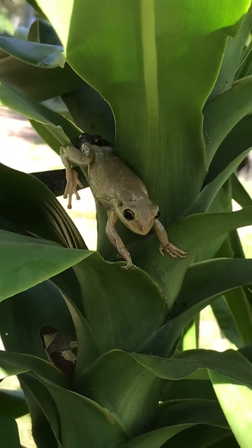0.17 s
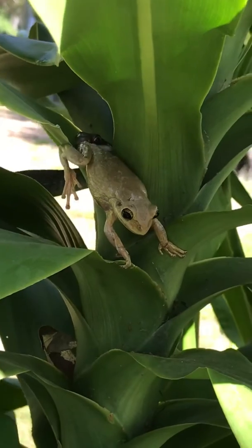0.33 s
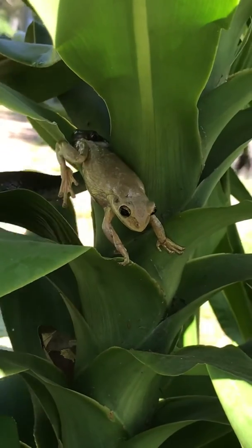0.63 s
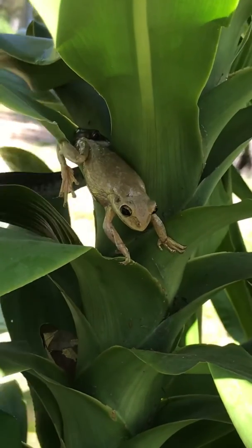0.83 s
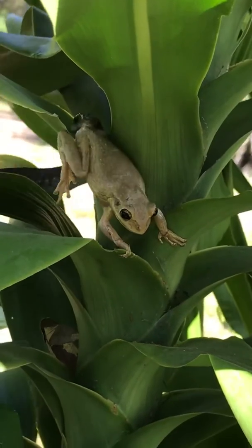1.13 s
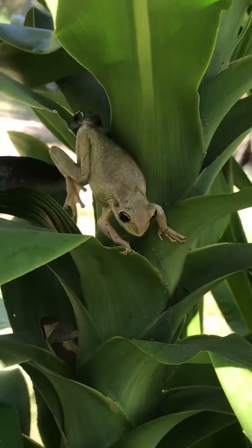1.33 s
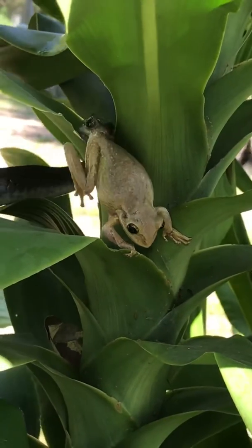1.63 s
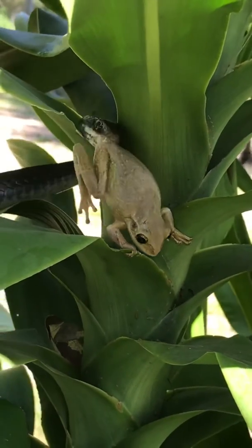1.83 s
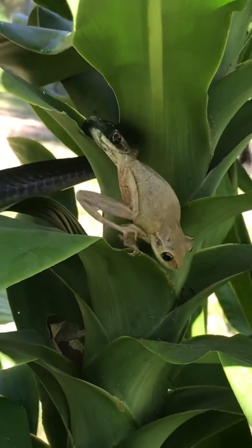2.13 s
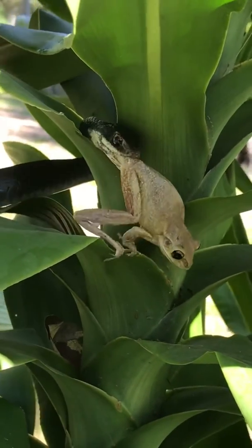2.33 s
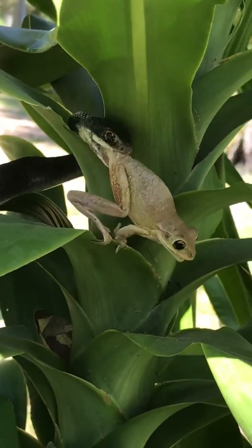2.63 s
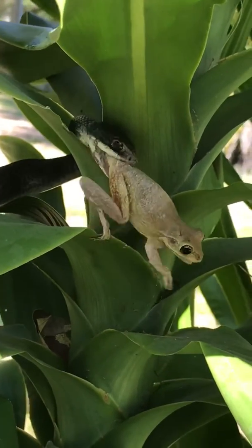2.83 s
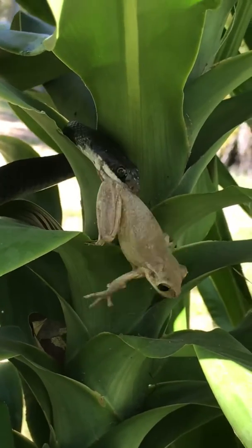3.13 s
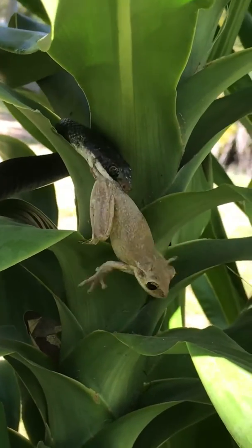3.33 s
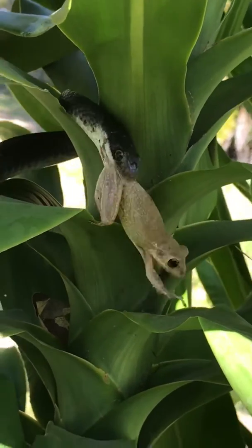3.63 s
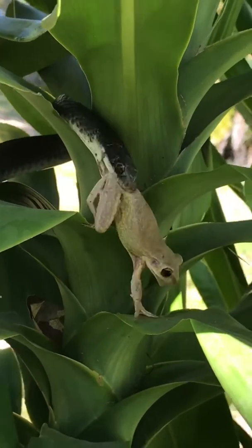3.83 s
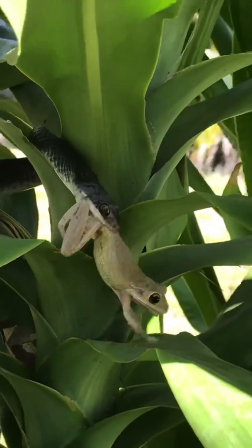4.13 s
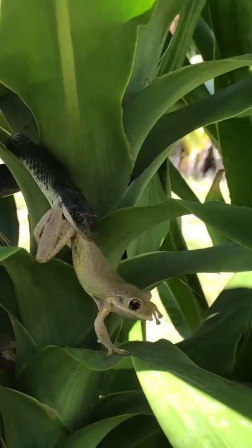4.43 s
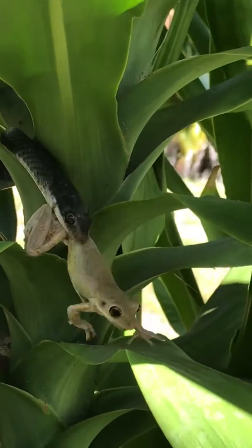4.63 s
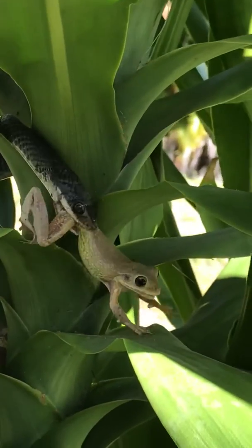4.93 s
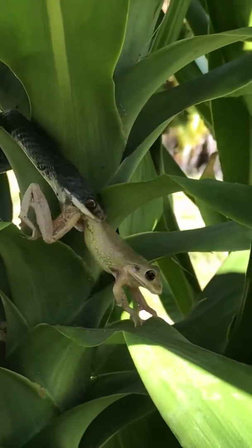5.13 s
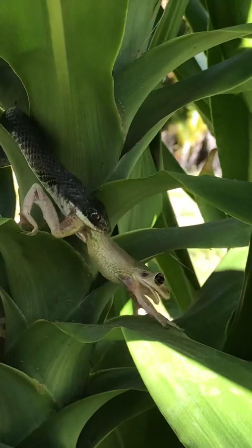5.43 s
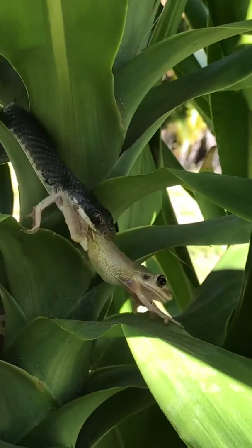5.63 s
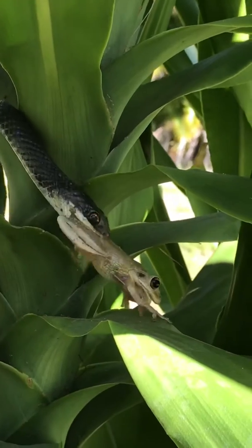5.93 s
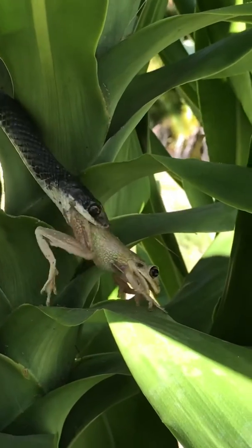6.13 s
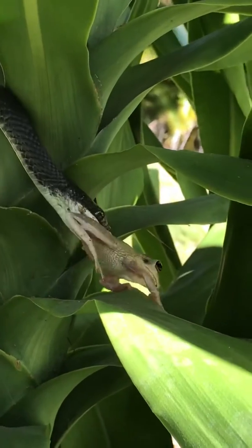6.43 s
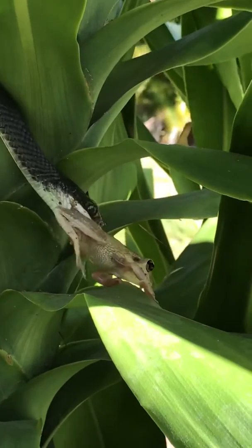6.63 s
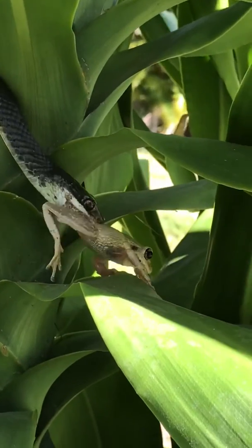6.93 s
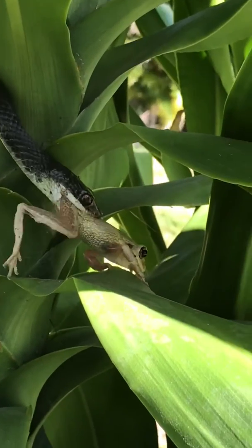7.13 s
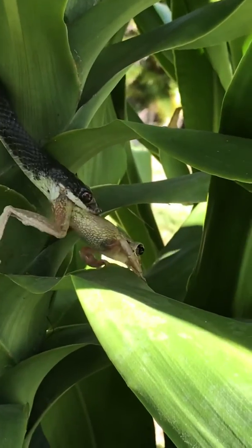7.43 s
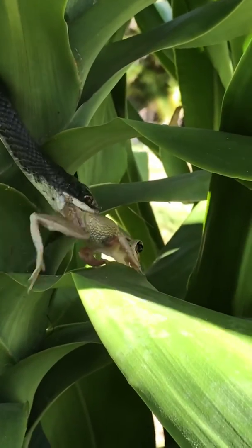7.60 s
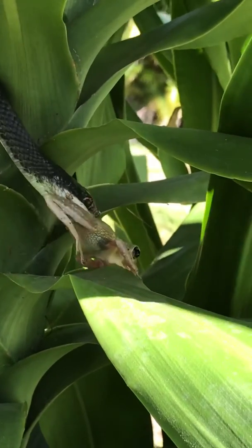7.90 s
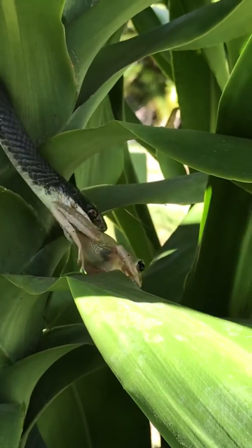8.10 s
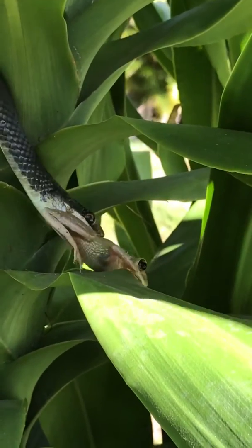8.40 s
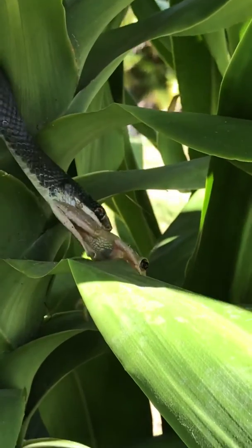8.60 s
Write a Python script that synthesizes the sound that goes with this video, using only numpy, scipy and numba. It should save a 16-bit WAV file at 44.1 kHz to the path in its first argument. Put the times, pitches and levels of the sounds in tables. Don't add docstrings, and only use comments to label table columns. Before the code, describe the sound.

Outdoors among broad leaves, close to a phone microphone: soft bright rustling, one sharp leaf tick, faint rising bird whistles and a distant dove coo over low traffic hum. Then a frog screams seven times, piercing, arching and falling in pitch, each shutting into a dull creak, some followed by tiny squeaky gasps. Wind buffets grow under the later screams; afterwards leaves and dove remain.

```python
import sys
import numpy as np
from scipy import signal
from scipy.io import wavfile
from scipy.ndimage import uniform_filter1d
from numba import njit

SR = 44100
rng = np.random.default_rng(int(sys.argv[2]) if len(sys.argv) > 2 else 0)


def elevation(decibels):
    levels = np.asarray(decibels, float)
    return 10 ** (levels / 20)


def generate_wav(signal):
    frames = np.transpose(np.atleast_2d(signal))
    scaled = np.clip(frames, -1, 1) * 32767
    pcm = np.round(scaled).astype(np.int16)
    wavfile.write(sys.argv[1], SR, pcm)


N = 386316
STEP = 96

# time_s, pitch_hz
SCREAM_PITCHES = [
    [(2.42, 575.4), (2.436, 646), (2.48, 685), (2.586, 613), (2.62, 632), (2.646, 662.5), (2.754, 685.7),
     (2.836, 617), (2.9, 586.5)],
    [(3.014, 503), (3.05, 592), (3.092, 764), (3.124, 776), (3.164, 770), (3.196, 711), (3.3, 660),
     (3.34, 590)],
    [(3.737, 450), (3.786, 715), (3.808, 766), (3.854, 770.6), (4.028, 667), (4.164, 615.6), (4.278, 613.6),
     (4.315, 538)],
    [(4.628, 532), (4.66, 618), (4.686, 725), (4.724, 740), (4.8, 631.6), (4.848, 622.5), (4.928, 541),
     (4.955, 496)],
    [(5.342, 293), (5.412, 509), (5.434, 513), (5.47, 473), (5.5, 472), (5.53, 472.2), (5.622, 468.5),
     (5.648, 430.3)],
    [(5.928, 293.5), (5.95, 416), (5.998, 668), (6.018, 687), (6.06, 577), (6.114, 517.6), (6.22, 471.5),
     (6.247, 417)],
    [(7.503, 322), (7.544, 686), (7.568, 768), (7.602, 783), (7.65, 718), (7.674, 711.4), (7.778, 632.6),
     (7.886, 580), (7.92, 515)],
]
# time_s, mouth_resonance_hz, level_db
JAWS = [
    [(2.442, 4600, -25.5), (2.476, 6650, -24.5), (2.65, 5130, -23.5), (2.762, 5210, -22),
     (2.864, 4450, -21.5), (2.885, 3920, -29)],
    [(3.05, 3880, -31), (3.082, 4420, -19.5), (3.134, 4220, -27), (3.185, 4300, -19), (3.292, 3790, -26),
     (3.325, 3195, -27.5)],
    [(3.749, 5300, -32), (3.763, 5930, -21), (3.817, 6040, -19.5), (4.0, 5350, -20.5), (4.125, 4610, -20),
     (4.268, 4380, -17.5), (4.295, 3840, -23)],
    [(4.644, 5280, -25.5), (4.682, 6580, -20.5), (4.78, 5930, -17.5), (4.864, 5610, -23),
     (4.942, 4220, -25.5)],
    [(5.358, 5960, -31), (5.416, 6110, -19.5), (5.48, 5920, -23), (5.602, 5200, -24.5), (5.635, 4255, -30)],
    [(5.94, 6160, -24.5), (6.014, 6690, -21), (6.08, 6360, -20), (6.204, 5740, -25.5), (6.235, 4540, -32.5)],
    [(7.521, 6550, -23), (7.583, 7370, -15), (7.7, 5910, -20), (7.746, 5740, -23.5), (7.886, 5120, -23),
     (7.913, 4340, -28)],
]
# throat_db, lower_skull_db, upper_skull_db, upper_skull_sag_db_per_s, throat_onset_db
SCREAM_COLOURS = [(-39, -41.5, -42.5, -12, -12), (-39.5, -36, -31, -1.5, -13), (-40, -36, -27.5, 12.5, -16),
                  (-41, -36, -32.5, 38, -13), (-40, -43, -44, 48, -27), (-43, -33, -36.5, 47.5, -5),
                  (-41, -31.5, -37, 21, -10)]
# end_s, last_pitch_hz, throat_db, lip_leak_db, leak_fading_db
CREAK_ENDS = [
    (2.996, 468, -42.5, -52, 1),
    (3.45, 189.7, -42.5, -44, -10.5),
    (4.386, 224, -39.5, -41.5, -27),
    (5.024, 213.9, -41.5, -48.5, -26),
    (5.734, 187.6, -40.5, -54, -29),
    (6.318, 209, -40, -56, -12),
    (8.012, 225.5, -39, -50.5, -29),
]
JAW_STARTS = [.7, .7, .6, .8, .9, .85, .5]
ONSET_CATCHES = [.05, .04, .12, .12, .15, .1, .12]
# start_s, roughness (0-1)
CORD_STUMBLES = [(3.14, .05), (4.0, .06), (4.66, .12), (5.44, .1), (5.5, .06), (6.03, .08), (7.71, .04),
                 (7.87, .08)]
RASP, RASP_AT = .03, .4


def screams():
    t, rough = np.arange(N) / SR, .006
    pitches, tracts = zip(*map(cry, SCREAM_PITCHES, JAWS, SCREAM_COLOURS, CREAK_ENDS, JAW_STARTS))
    onsets = [(pitch[0][0], catch) for pitch, catch in zip(SCREAM_PITCHES, ONSET_CATCHES)]
    rasps = []
    for pitch, creak in zip(SCREAM_PITCHES[1:], CREAK_ENDS[1:]):
        shut_s = pitch[-1][0]
        rasps.append((shut_s + RASP_AT * (creak[0] - shut_s), RASP))
    for start, catch in onsets + list(CORD_STUMBLES) + rasps:
        rough = rough + catch * (t > start) * np.exp(-((t - start) / .04) ** 2)
    clean = voice(sum(pitches, []), sounding(tracts), open_tract, .003 + .03 * rough, count=54)
    return clean * (1 + rough * drift(300))


THROAT_DB_PER_SLACK, SKULL_DB_PER_SLACK = 12, -60
ONSET_DB, TOP_LATE_DB, TOP_RISE_S = -32.5, -17.5, 0.065
SHUT_S = 0.014
CREAK_STEP, CREAK_BEND = .08, 0.51
CREAK_HOLD, CREAK_FADE_DB = .9, -16
SKULL_LEAK_DB, SKULL_DAMP_DB = -5, -19


def cry(pitch, jaw, colour, creak, open_from):
    (s, hz), (jaw_s, mouth_hz, mouth_db) = np.transpose(pitch), np.transpose(jaw)
    throat_db, between_db, top_db, sag_db, entry_db = colour
    end, last_hz, creak_db, leak_db, fade_db = creak
    fall = 1 - last_hz / hz[-1]

    t = np.append(np.arange(s[0], jaw_s[-1], .004), jaw_s[-1])
    slack = (1 - np.interp(t, s, hz) / hz.max()) * (t > s[hz.argmax()])
    early = np.clip((jaw_s[0] - t) / (jaw_s[0] - s[0]), 0, 1)
    swell = ONSET_DB * early
    late = TOP_LATE_DB * np.exp(-(t - s[0]) / TOP_RISE_S)
    opened = [t,
              np.interp(t, jaw_s, mouth_hz) * open_from ** early,
              throat_db + THROAT_DB_PER_SLACK * slack + entry_db * early,
              np.interp(t, jaw_s, mouth_db) + swell,
              between_db + SKULL_DB_PER_SLACK * slack + late / 2 + .6 * swell,
              top_db - sag_db * (t - s[0]) + late + 0.53 * swell]

    part = np.linspace(0, 1, 12)
    from_hz = (1 - CREAK_STEP * fall) * hz[-1]
    creak_hz = from_hz + (last_hz - from_hz) * part ** (from_hz / last_hz) ** CREAK_BEND
    falling = zip(s[-1] + 0.0027 + part * (end - s[-1]), creak_hz)
    shut = jaw_s[-1] + SHUT_S
    fading = CREAK_FADE_DB * fall / 0.42 * np.clip((part - CREAK_HOLD) / (1 - CREAK_HOLD), 0, 1)
    leak = leak_db + fade_db * part
    skull = leak + SKULL_LEAK_DB + SKULL_DAMP_DB * fall * part
    closed = [shut + part * (end - shut), 0 * part + mouth_hz[-1], creak_db + fading, leak, skull, skull]
    return list(pitch) + list(falling), list(zip(*opened)) + list(zip(*closed))


THROAT_OPEN_HZ, THROAT_SHUT_HZ, THROAT_WIDTH_HZ = 2130, 1536, 1190
# centre_hz, width_hz, level_db relative to the throat
PHARYNX_MODE = (3300, 1300, -10)
# centre_hz, width_hz
SKULL_MODES = [(9300, 3200), (14600, 3400)]
# centre_hz, width_hz, level_db
NOSTRIL_MODES = [(7300, 300, 15), (11700, 300, 8)]


def open_tract(hz, mouth_hz, throat_db, mouth_db, between_db, top_db):
    gape = 1 / (1 + elevation(2 * (throat_db - mouth_db)))
    throat_hz = THROAT_SHUT_HZ + gape * (THROAT_OPEN_HZ - THROAT_SHUT_HZ)
    throat = resonance(hz, throat_hz, THROAT_WIDTH_HZ) ** 2
    throat = evened(throat * resonance(hz, throat_hz, 1500 + 900 * (1 - gape)))
    throat = throat - gape * elevation(PHARYNX_MODE[2]) * evened(resonance(hz, *PHARYNX_MODE[:2]) ** 2)
    throat = throat * (1 - 0.72 * gape * resonance(hz, 2700, 900))

    mouth_hz = 3400 + gape * (mouth_hz - 3400)
    mouth = resonance(hz, mouth_hz, 450 * (mouth_hz / 4500) ** 1.6)
    mouth = mouth + 0.41 * resonance(hz, 0.78 * mouth_hz, 1200)
    mouth = mouth + 0.31 * resonance(hz, 1.223 * mouth_hz, 900)
    mouth = mouth * resonance(hz, mouth_hz, 2400) ** 2
    mouth = mouth * (1 - 0.93 * resonance(hz, 8020, 1100))

    scatter = np.exp(2j * np.sin(hz / 450))
    between, top = [resonance(hz, *mode) ** 2 * scatter for mode in SKULL_MODES]
    nostrils = sum(elevation(db) * resonance(hz, *mode) ** 2 for *mode, db in NOSTRIL_MODES)
    between = between + (1 - gape) * nostrils
    top = top * resonance(hz, 15000 * (mouth_hz / 5500) ** .2, 2500)
    return (elevation(throat_db) * throat + elevation(mouth_db) * evened(mouth)
            - elevation(between_db) * evened(between) + elevation(top_db) * evened(top))


# delay_ms, share
LEAF_ECHOES = [(0.618, 0.1), (1.129, 0.085), (2.3, 0.31), (4.898, 0.28)]


def voice(pitch_rows, tract_rows, tract, jitter, count):
    rate = in_time(pitch_rows, round_s=.016)[0] * (1 + .003 * drift(18) + .0025 * drift(40))
    grid = np.minimum(np.arange(N // STEP + 2) * STEP, N - 1)
    controls = in_time(tract_rows, STEP, round_s=.003)
    live = controls[-1] > -119
    hz = rate[grid[live], None] * np.arange(1, count + 1)
    sway = .035 * drift(2)[grid[live], None]
    echoes = 1
    for ms, share in LEAF_ECHOES:
        echoes = echoes + share * np.exp(-2j * np.pi * hz * ms / 1000 * (1 + sway))
    response = np.zeros((len(grid), count), complex)
    response[live] = tract(hz, *[c[live, None] for c in controls]) * echoes * (hz < .45 * SR)
    phase = 2 * np.pi * np.cumsum(rate * (1 + jitter * drift(150))) / SR
    return stack(phase, response, STEP)


@njit
def stack(phase, response, step):
    out = np.zeros(len(phase))
    for i in range(len(phase)):
        j, part = i // step, (i % step) / step
        if abs(response[j, 3]) + abs(response[j, 4]) < 1e-5:
            continue
        turn = np.exp(1j * phase[i])
        z = turn
        for k in range(response.shape[1]):
            strength = (1 - part) * response[j, k] + part * response[j + 1, k]
            out[i] += (z * strength).real
            z *= turn
    return out


def resonance(hz, centre_hz, width_hz):
    return 1 / (1 + 1j * (hz ** 2 - centre_hz ** 2) / (hz * width_hz))


def evened(response):
    return response / np.sqrt(np.sum(np.abs(response) ** 2, axis=1, keepdims=True) / 2)


# start_s, length_s, top_pitch_hz, level_db
GASP_EVENTS = [
    (3.476, 0.091, 636, -57.5),
    (4.475, 0.056, 574, -53),
    (5.748, .095, 560, -53),
    (6.347, 0.078, 564, -53.5),
]
GASP_PEAK, GASP_FROM, GASP_TO = .4, .82, .8
GASP_IN_DB, GASP_OUT_DB = -7, -4


def gasps():
    arches = []
    for s, length, hz, db in GASP_EVENTS:
        arches.append([(s, GASP_FROM * hz, db + GASP_IN_DB),
                       (s + GASP_PEAK * length, hz, db),
                       (s + length, GASP_TO * hz, db + GASP_OUT_DB)])
    pitch_rows, level_rows = [[(row[0], row[k]) for row in sounding(arches)] for k in (1, 2)]

    def shut_tract(hz, db):
        return elevation(db) * evened(resonance(hz, 1800, 1100) ** 3)

    return voice(pitch_rows, level_rows, shut_tract, .02, count=8) * (1 + .5 * drift(400))


# peak_s, level_db
GUST_PEAKS = [(3.54, -40.5), (4.44, -34.5), (5.15, -37), (5.301, -39), (5.561, -33), (5.98, -27.5),
              (6.42, -27), (6.78, -35.5), (7.068, -32.5), (7.5, -35.5)]
GUST_RISE_DB_PER_S, GUST_FALL_DB_PER_S = 117, 77
# time_s, level_db
BREEZE = [(0, -46), (.55, -46), (3.3, -50.5), (4.2, -42.5), (4.95, -45.5), (5.8, -36), (6.9, -39),
          (7.64, -49.5), (8.76, -45)]
# frequency_hz, density_db per Hz
PORT_SPECTRUM = [(12, -35.5), (20, -17), (43, 8), (65, 7.5), (140, -6), (264, -44.5), (400, -44),
                 (520, -54), (880, -120)]


def wind():
    t, (db,) = np.arange(N) / SR, in_time(BREEZE)
    for s, gust_db in GUST_PEAKS:
        flank_db = np.minimum(GUST_RISE_DB_PER_S * (t - s), GUST_FALL_DB_PER_S * (s - t))
        db = np.maximum(db, gust_db + flank_db)
    return elevation(db) * banded_noise(PORT_SPECTRUM, patchy_db=1.0, flicker_hz=29)


# time_s, level_db
RUSTLE_LEVELS = [(0, -56.5), (.34, -54.5), (.39, -52.5), (.42, -54.5), (.92, -60.5), (1.19, -59),
                 (2.38, -58.5), (3.66, -62), (5.05, -67.5), (5.18, -65), (6.45, -65), (7.47, -64.5),
                 (8.05, -58), (8.76, -57)]
# frequency_hz, density_db per Hz
FOLIAGE_SPECTRUM = [(1180, -33), (2000, 0), (3210, 4), (4970, -3), (5880, -2), (10400, -6), (11800, -3.5),
                    (19000, -11)]


def rustle():
    return elevation(in_time(RUSTLE_LEVELS)[0]) * banded_noise(FOLIAGE_SPECTRUM, patchy_db=-0.7, flicker_hz=7.1)


# start_s, peak_level_db, centre_hz
LEAF_TICKS = [
    (0.3895, -25, 13000),
    (0.407, -49, 3400),
    (5.1716, -45, 3780),
    (5.172, -46, 12400),
    (5.24, -46.5, 12500),
    (5.885, -45, 3080),
    (8.094, -43, 4140),
]


def ticks():
    out, t = np.zeros(N), np.arange(1500) / SR
    for s, db, hz in LEAF_TICKS:
        band = signal.butter(2, [hz * 0.67, min(hz * 1.23, .45 * SR)], "band", fs=SR, output="sos")
        noise = rms_one(signal.sosfilt(band, rng.standard_normal(len(t))))
        at = round(s * SR)
        out[at:at + len(t)] += elevation(db - 9) * noise * np.exp(-t / 0.0044)
    return out


# time_s, pitch_hz, level_db
DOVE_COOS = [
    [(1.95, 579, -74), (2.248, 562, -69), (2.272, 500, -78), (2.35, 580, -83)],
    [(7.93, 577, -78), (7.964, 534.4, -66), (8.356, 522, -65.5), (8.38, 589, -61)],
]


def dove():
    hz, db = in_time(sounding(DOVE_COOS))
    return elevation(db + 9) * np.sin(2 * np.pi * np.cumsum(hz) / SR)


# start_s, length_s, from_hz, to_hz, level_db
BIRD_CHIRPS = [
    (.34, .15, 2100, 3300, -69),
    (.87, .13, 2200, 3450, -70),
    (1.0, .08, 2400, 3100, -73),
    (1.4, .13, 2250, 3250, -70),
    (1.51, .07, 2300, 2900, -70),
]


def bird():
    out = np.zeros(N)
    for s, length, from_hz, to_hz, db in BIRD_CHIRPS:
        n = round(length * SR)
        whistle = np.sin(2 * np.pi * np.cumsum(np.linspace(from_hz, to_hz, n)) / SR)
        out[round(s * SR):][:n] += elevation(db + 9) * np.hanning(n) ** .5 * whistle
    return out


# frequency_hz, density_db per Hz
HUM_SPECTRUM = [(88, -12), (150, -3.5), (282, -12), (477, -14.5), (574, -10), (807, -15), (871, -6),
                (1360, -16), (2270, -23), (6000, -37.5), (7800, -70.5), (13200, -120)]
HUM_DB = -51


def hum():
    return elevation(HUM_DB) * banded_noise(HUM_SPECTRUM, patchy_db=.5, flicker_hz=5)


def banded_noise(spectrum, patchy_db, flicker_hz):
    hz, db = np.transpose(spectrum)
    edges = hz[0] * 2 ** np.arange(0, np.log2(min(hz[-1], .45 * SR) / hz[0]), .5)
    out, white = 0, rng.standard_normal((2, N))
    together, own = drift(flicker_hz), drift(flicker_hz)
    for k, (low, high) in enumerate(zip(edges, edges[1:])):
        band = signal.sosfilt(signal.butter(2, [low, high], "band", fs=SR, output="sos"), white[k % 2])
        flicker_db = patchy_db * (1.3 * together + 2.4 * np.roll(own, k * k * SR // 7))
        level_db = np.interp(np.log(low * high) / 2, np.log(hz), db)
        out = out + band * elevation(level_db + flicker_db)
    return rms_one(out)


def drift(rate_hz):
    r = np.exp(-2 * np.pi * rate_hz / SR)
    return rms_one(signal.lfilter([1], [1, -2 * r, r * r], rng.standard_normal(N + SR))[SR:])


def rms_one(x):
    return x / np.sqrt(np.mean(x ** 2) + 1e-20)


def in_time(rows, every=1, round_s=0.):
    s, *columns = np.transpose(sorted({row[0]: row for row in rows}.values()))
    t = np.arange(0, N + every, every)[:N] / SR
    return [uniform_filter1d(np.interp(t, s, c), 1 + int(round_s * SR / every)) for c in columns]


def sounding(spans):
    rows = [row for span in spans for row in span]
    starts, ends = {span[0][0] for span in spans}, {span[-1][0] for span in spans}
    for span in spans:
        for row, free, shift in ((span[0], ends, -.004), (span[-1], starts, .004)):
            if min(abs(row[0] - s) for s in free) > .03:
                rows.append((row[0] + shift, *[v if v > 0 else -120 for v in row[1:]]))
    return rows


RUSTLE_DIP_DB = -7


def scene():
    frog = screams()
    loudness = uniform_filter1d(np.abs(frog), SR // 40)
    leaf_gain = elevation(RUSTLE_DIP_DB * np.clip(loudness / .02, 0, 1))
    mono = frog + gasps() + wind() + leaf_gain * rustle() + ticks() + dove() + bird() + hum()
    return np.array([mono, mono])


# start_s, low_hz, high_hz
NOISE_SWAPS = [(2.514, 6630, 8530), (2.514, 12230, 16110), (2.586, 14300, 16020), (2.769, 8010, 9820),
               (2.769, 10770, 12580), (2.769, 12830, 15420), (3.21, 12830, 16110), (3.258, 12830, 16110),
               (3.258, 8100, 10510), (3.86, 8700, 11200), (3.86, 11460, 13260), (3.86, 13520, 16110),
               (3.933, 10160, 13350), (4.717, 6630, 8530), (5.42, 12920, 14640), (5.512, 8100, 9820),
               (5.512, 10160, 12580), (6.113, 6630, 8440), (6.113, 8790, 11110)]
SWAP_S, SWAP_DB = .044, 0


def swapped(x):
    out, n = x.copy(), round(SWAP_S * SR)
    for s, low_hz, high_hz in NOISE_SWAPS:
        at = round(s * SR)
        band = signal.butter(4, [low_hz + 150, high_hz - 150], "band", fs=SR, output="sos")
        noise = rms_one(signal.sosfiltfilt(band, rng.standard_normal((2, n))))
        tones = signal.sosfiltfilt(band, x[:, at:at + n])
        out[:, at:at + n] += np.hanning(n) * (elevation(SWAP_DB) * tones.std() * noise - tones)
    return out


def top_cut(x):
    return signal.sosfilt(signal.butter(12, 16430, fs=SR, output="sos"), x)


PORT_DIP_HZ, CUTOFF_HZ = 10700, 15850


def record(dry):
    dipped = dry - 0.2 * signal.lfilter(*signal.iirpeak(PORT_DIP_HZ, 9, fs=SR), dry)
    cut = signal.sosfilt(signal.ellip(10, .5, 60, CUTOFF_HZ, fs=SR, output="sos"), dipped)
    cut = signal.sosfilt(signal.butter(2, 30, "high", fs=SR, output="sos"), cut)
    mix = swapped(cut)
    return top_cut(mix)


dry = scene()
out = record(dry)
generate_wav(out)
```